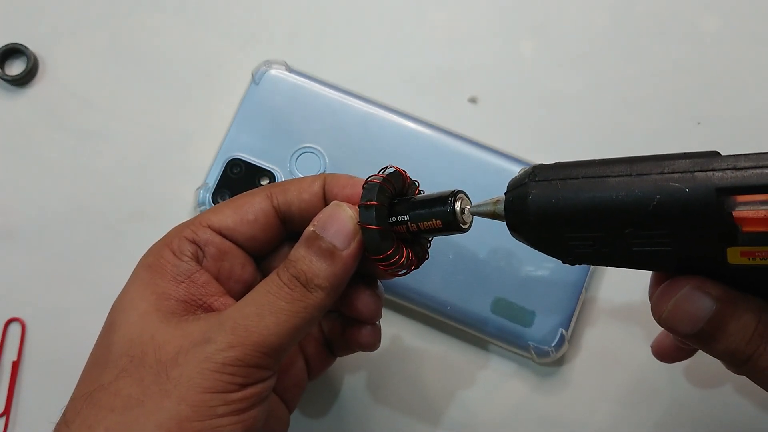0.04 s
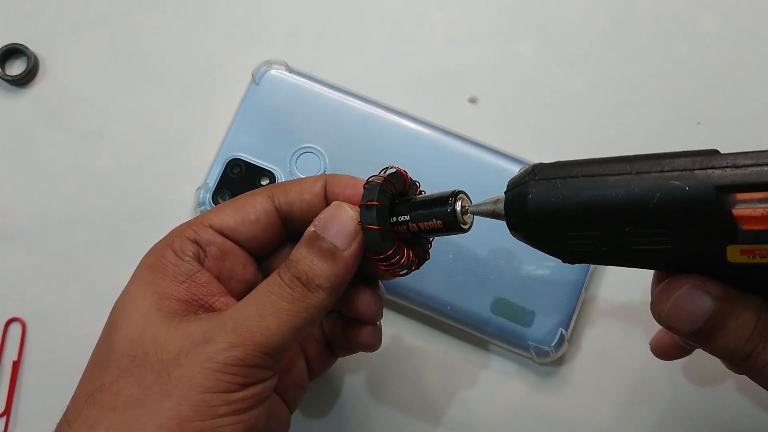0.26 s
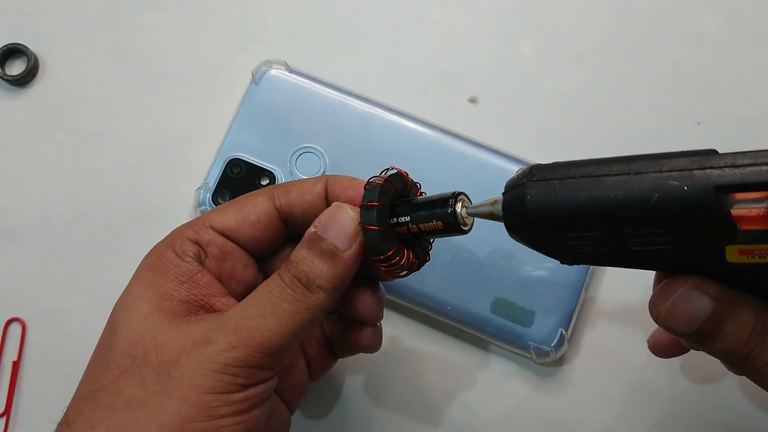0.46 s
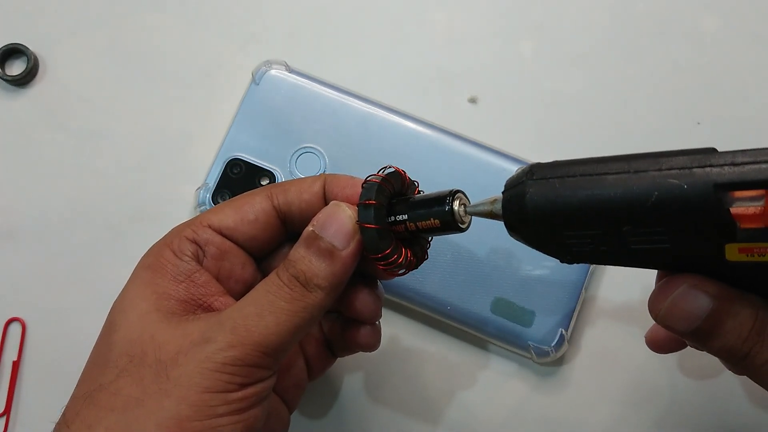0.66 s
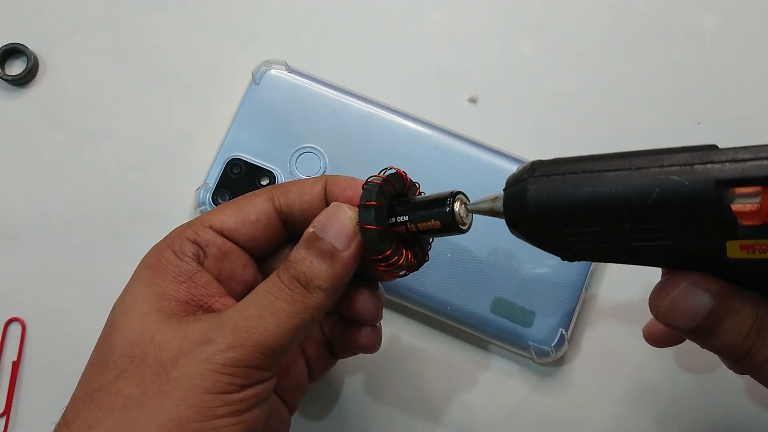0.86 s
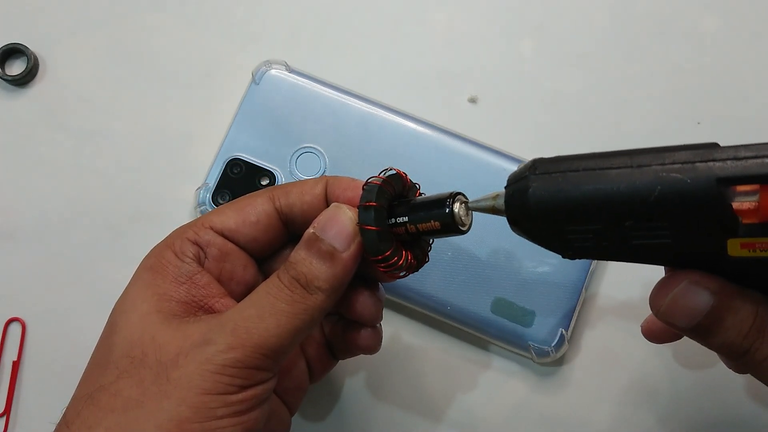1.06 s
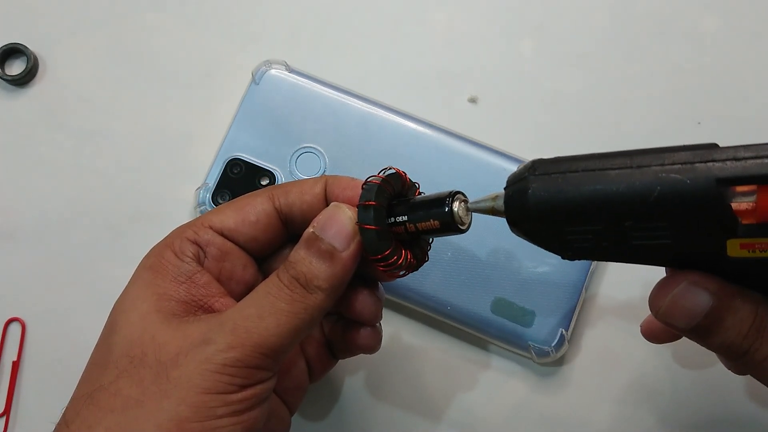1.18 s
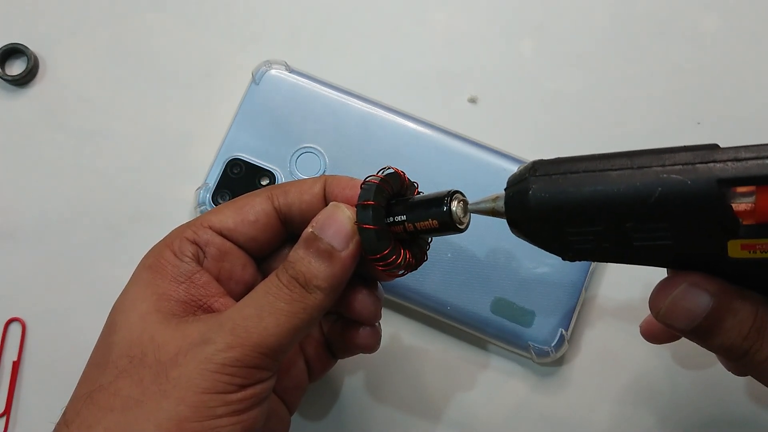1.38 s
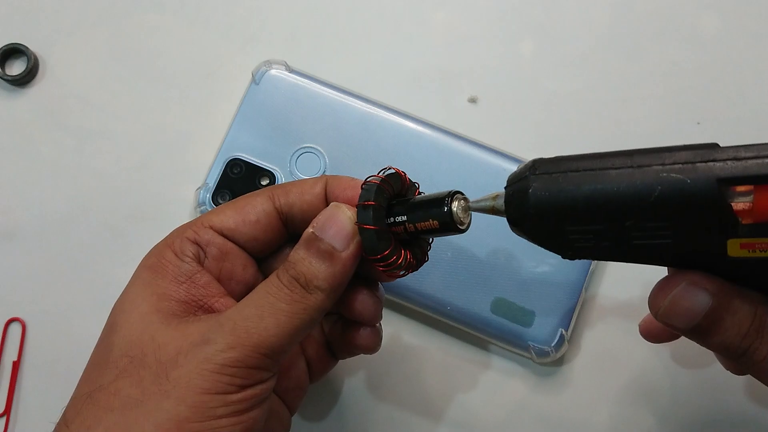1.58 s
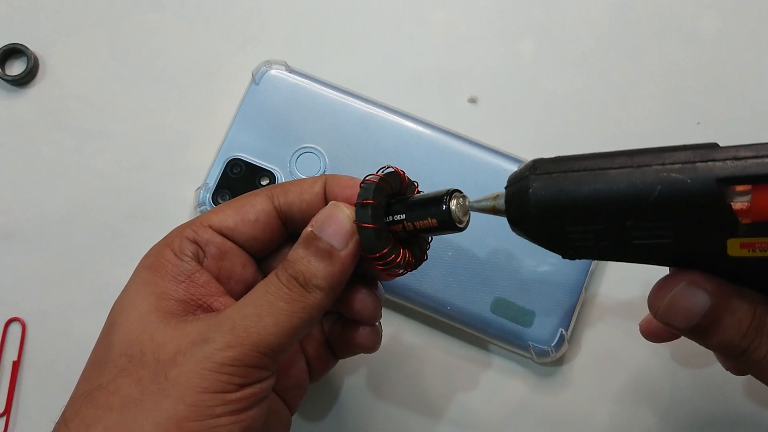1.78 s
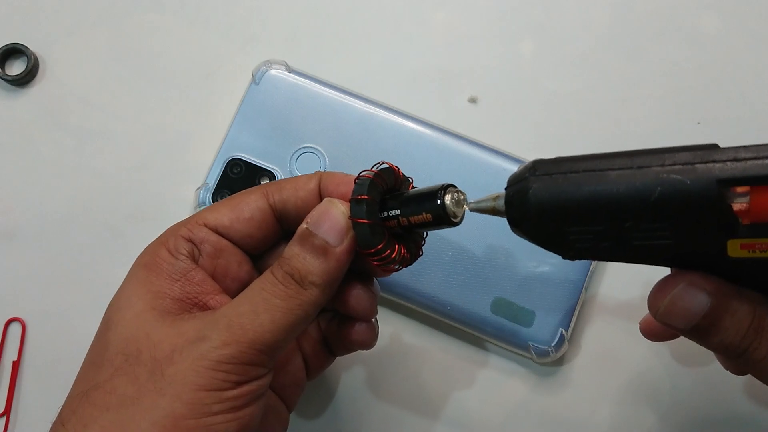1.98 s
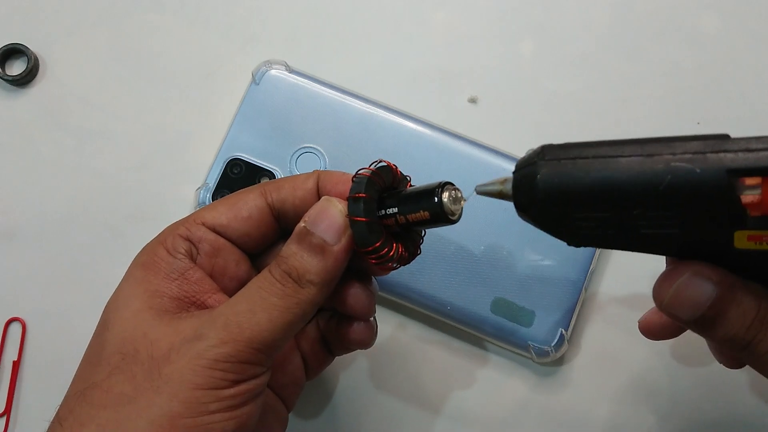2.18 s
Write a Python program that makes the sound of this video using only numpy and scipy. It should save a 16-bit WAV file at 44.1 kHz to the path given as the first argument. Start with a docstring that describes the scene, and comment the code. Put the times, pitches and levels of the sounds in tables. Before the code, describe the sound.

A hot glue gun gives one sharp, bright plastic click at about 1.6 seconds, close by, with a short echo from a small bare room. Before it come only a faint hand rustle at the start and tiny ticks near 0.8 and 1.4 seconds. A small cluster of light handling ticks follows around 2.2 seconds. A very quiet room rush and low hum continue throughout.

```python
"""A desk in a small bare room: a hot glue gun, held against a battery, gives one sharp plastic click.
The snap and its quick rebound push the air and ring the shell for a few milliseconds; the walls answer.
Faint handling ticks and hand rustles come before and after, and the sliding nozzle barely squeaks.
Underneath lies a bed of room rush, fan tones and low mains hum."""
import sys
import numpy as np
from scipy import signal
from scipy.fft import rfft, irfft
from scipy.io import wavfile

SR = 44100
rng = np.random.default_rng(int(sys.argv[2]) if len(sys.argv) > 2 else 0)


def file_out(sig):
    """Save sig as 16-bit WAV at sys.argv[1]."""
    # one column per channel
    cols = np.atleast_2d(sig).T
    # limit, then scale
    lim = np.clip(cols, -1, 1)
    pcm = np.round(lim * 32767).astype(np.int16)
    wavfile.write(sys.argv[1], SR, pcm)


N = 98651


def amp(db):
    """Decibels to gain."""
    return 10 ** (np.asarray(db) / 20)


def unit(x):
    """Scales to rms 1."""
    return x / np.sqrt(np.mean(abs(x) ** 2) + 1e-20)


def read(points, hz, column=1):
    """Reads a column of a table on a log-frequency axis."""
    table = np.array(points, float)
    return np.interp(np.log(hz + 1), np.log(table[:, 0] + 1), table[:, column])


def pan(db):
    """Left and right gains for a left-minus-right level difference."""
    return amp([[db / 2], [-db / 2]])


def add(mix, start, sound):
    """Lays a sound into the stereo mix at a time in seconds."""
    part = mix[:, round(start * SR):][:, :sound.shape[-1]]
    part += sound[..., :part.shape[1]]


def pulse(points, column=1, size=4096):
    """A minimum-phase pulse with the given spectrum."""
    log_gain = np.log(amp(read(points, abs(np.fft.fftfreq(size, 1 / SR)), column)))
    return np.fft.ifft(np.exp(np.conj(signal.hilbert(log_gain)))).real[:size // 2]


def drift(hz):
    """Smooth random motion of rms 1, rolling off above hz."""
    f = np.fft.rfftfreq(N, 1 / SR)
    return unit(irfft(rfft(rng.standard_normal(N)) * np.exp(-(f / hz) ** 2) * (f > 0), N))


def soften(x, hz):
    """Gentle one-pole low-pass."""
    r = np.exp(-2 * np.pi * hz / SR)
    return signal.lfilter([1 - r], [1, -r], x)


def decay(t, t60):
    """Exponential envelope, 60 dB down at t60."""
    return np.exp(-np.log(1000) * t / t60)


def swell(start, length):
    """One smooth rise and fall, timed in seconds."""
    return np.sin(np.pi * np.clip((np.arange(N) / SR - start) / length, 0, 1))


def room_rush():
    """Room tone: dark noise, narrow in the bass and wide on top, its hiss easing down and back up."""
    # tone of the rush: f/Hz, relative level/dB
    spectrum = [(20, -25), (33, -16), (50, -3.5), (68, 1), (85, 3.5), (110, -5.5), (135, 1.5), (170, -6.5),
                (200, -4), (240, -5.5), (300, -10), (420, -9), (540, -12), (680, -17.5), (810, -8.5),
                (950, -18), (1150, -22.5), (1350, -19.5), (1700, -30), (2200, -29.5), (2650, -31.5),
                (3400, -34), (4300, -32.5), (5100, -42), (5800, -46.5), (8000, -39.5), (12000, -36.5),
                (15500, -38)]
    # likeness of left and right: f/Hz, correlation/0-1
    likeness = [(50, 1), (1000, 0.73), (3000, 0.6), (8000, 0.2), (15000, .3)]
    # stereo balance: f/Hz, left minus right/dB
    balance = [(60, -3.5), (180, -4.5), (550, -4), (1650, -7), (5000, 2.5), (15000, -3)]
    # ride of the treble shelf: t/s, gain/dB
    hiss_ride = [(0, 3), (.55, 2.5), (.9, 0), (1.55, 0.5), (2.0, 2), (2.24, 3.5)]
    hz, t = np.fft.rfftfreq(N, 1 / SR), np.arange(N) / SR
    a, b = rfft(rng.standard_normal((2, N)))
    same, lean = read(likeness, hz), amp(read(balance, hz) / 2)
    pair = np.array([a * lean, (same * a + np.sqrt(1 - same ** 2) * b) / lean])
    rush = unit(irfft(pair * amp(read(spectrum, hz)), N))
    hiss = rush - soften(rush, hz=3300)
    hiss_gain = amp(np.interp(t, *np.transpose(hiss_ride)))
    return amp(-63 + 0.15 * drift(hz=3)) * (rush + (hiss_gain - 1) * hiss)


def hum():
    """Faint wavering fan tones and a slowly swelling mains hum, right of centre."""
    # fan tones: f/Hz, level/dB
    fan_tones = [(48.4, -70.5), (301, -80), (770, -84.5), (826, -85)]
    # swell of the mains hum: t/s, gain/dB
    mains_ride = [(0, 5), (.2, -0.5), (.35, -2.5), (.7, -6), (.9, 5), (1.0, 1.5), (1.07, -3), (1.35, -2.5),
                  (1.6, -2.5), (1.85, 7), (2.0, -6), (2.24, 0.5)]
    fan, t = np.zeros(N), np.arange(N) / SR
    for hz, db in fan_tones:
        waver = 1 + 0.38 * (drift(hz=8.3) + 1j * drift(hz=8.3))  # in level and phase
        fan += amp(db) * unit((waver * np.exp(2j * np.pi * (hz * t + rng.random()))).real)
    mains_hz, mains_db = 95.9, -66.5 + np.interp(t, *np.transpose(mains_ride))
    mains = amp(mains_db) * unit(np.sin(2 * np.pi * (mains_hz * t + rng.random())))
    return pan(db=-4.5) * (fan + mains)


def room_response(size=256):
    """Sparse reflections, weak until the walls answer, each band dying at its own speed."""
    # reverb time: f/Hz, t60/s
    reverb_times = [(200, 0.34), (700, 0.33), (1800, .5), (4600, 0.47), (8500, 0.4), (12500, 0.32),
                    (16000, 0.32)]
    # likeness of left and right in the reverb: f/Hz, correlation/0-1
    likeness = [(200, 0.5), (500, 1), (1000, 0), (3000, 0)]
    attack_s, walls_s, early_gain = .002, .01, .45
    taps = rng.standard_normal((2, SR)) * (rng.random((2, SR)) < .25)
    hz, frame_s, (a, b) = signal.stft(taps, SR, nperseg=size)
    same = read(likeness, hz)[:, None]
    bands = np.array([a, same * a + np.sqrt(1 - same ** 2) * b])
    bands *= decay(frame_s, read(reverb_times, hz)[:, None])
    tail = signal.istft(bands, SR, nperseg=size)[1][:, :SR]
    t = np.arange(SR) / SR
    tail *= np.minimum(t / attack_s, 1) * np.where(t < walls_s, early_gain, 1)
    return tail / np.linalg.norm(tail, axis=1, keepdims=True)


def rubbing():
    """The hands shift with a dull rustle, and the nozzle squeaks faintly as it slides off."""
    # hand rustles: t/s, length/s, centre f/Hz, level/dB
    rustles = [(0.0, 0.19, 157, -68), (2.169, 0.045, 590, -78), (2.171, 0.039, 3050, -78.5)]
    squeak_hz = 2190
    slips = drift(hz=69.4) + 1j * drift(hz=69.4)
    squeak = unit((slips * np.exp(2j * np.pi * squeak_hz * np.arange(N) / SR)).real)
    out = amp(-84.5) * swell(start=1.954, length=.2) * squeak
    for start, length, hz, db in rustles:
        band = signal.butter(2, [hz / 2, hz * 2], "band", fs=SR, output="sos")
        rustle = unit(signal.sosfilt(band, rng.standard_normal(N)))
        out += amp(db) * swell(start, length) * rustle
    return pan(db=-6) * out


def handling_ticks():
    """Small ticks of gun and battery: a puff of noise and one short, rough ring each, with reverb."""
    # ticks: t/s, level/dB, left minus right/dB, body f/Hz, body gain/dB, snap gain/dB
    ticks = [(0.7514, -46, 5, 8800, -37, -2), (1.384, -52.5, 0, 4330, -22, -3.5),
             (1.6117, -46, 2, 9100, -27.5, 2.5), (2.1947, -31.5, -5.5, 1420, -25, -1.5),
             (2.1955, -30.5, -2, 812, -22, -14.5), (2.1963, -31.5, -6.5, 2860, -22, -7.5),
             (2.197, -34.5, 0, 4135, -16.5, -23), (2.2216, -37.5, -4, 2800, -34, 6),
             (2.2285, -31, 9.5, 4440, -17, -5)]
    out, t = np.zeros((2, N)), np.arange(SR // 10) / SR
    for start, db, pan_db, hz, body_db, snap_db in ticks:
        snap = amp(snap_db - 17) * rng.standard_normal((2, len(t))) * decay(t, t60=.009)
        roughness = .5 * drift(hz=400)[:len(t)]
        body = amp(body_db) * np.sin(2 * np.pi * hz * t + roughness) * decay(t, t60=.019)
        add(out, start, amp(db) * pan(pan_db) * (soften(snap, hz=6000) + body))
    reverb = signal.fftconvolve(out, room_response(), axes=1)[:, :N]
    return out + amp(-4.5) * reverb


def glue_gun_click():
    """The snap pushes the air and its rebound pulls it; both ring the shell, and the room answers."""
    # snap, then rebound: push gain/dB, push low-pass f/Hz, ring gain/dB
    contacts = [(2, 12000, 2), (-3, 860, 0)]
    # the shell's push on the air: f/Hz, level/dB
    push_spectrum = [(60, -17.5), (170, -12), (350, -0.5), (620, -4.5), (870, -0.5), (1150, -10),
                     (1420, -3.5), (2000, -8), (2700, -7.5), (3300, -6), (4000, -5.5), (5600, -15.5),
                     (9000, -2.5), (14000, -11.5), (16000, -15)]
    # modes of the shell: f/Hz, t60/s, left level/dB, right level/dB
    shell_modes = [(2600, .007, -52.5, -48), (4000, .009, -42.5, -50), (5320, .011, -39.5, -42),
                   (6560, 0.0045, -35, -24.5), (8370, 0.0078, -34.5, -23), (9230, 0.0055, -33, -17.5),
                   (9500, 0.0083, -31, -31), (10230, 0.0091, -19.5, -26.5), (11490, .009, -31.5, -25.5),
                   (12750, .009, -16, -25.5), (13440, 0.006, -18.5, -28), (13790, 0.0097, -20, -26.5),
                   (14400, 0.0072, -30.5, -28.5), (14880, .007, -36, -30)]
    # dense crack of the plastic: f/Hz, level/dB
    crack_spectrum = [(200, -26.5), (1500, -20), (5500, -11.5), (8500, -0.5), (13500, -1), (16000, -12)]
    # colour of the click as it fills the room: f/Hz, left level/dB, right level/dB
    send_spectrum = [(100, -16, -10.5), (351, -10, -7.5), (850, -13, -10), (1500, -21.5, -17),
                     (2500, -19, -17.5), (3300, -15, -14.5), (3800, -18, -19.5), (4600, -11.5, -14),
                     (5310, -14.5, -12), (6040, -18.5, -16.5), (6640, -7, -5.5), (7300, -9.5, -11.5),
                     (8140, -3.5, 1), (9200, 0, -0.5), (11000, 2, -2), (11600, -0.5, -4), (12900, 4.5, -5),
                     (14300, -2.5, -5.5), (14940, -5, -9), (15560, -19.5, -25)]
    click_s, rebound_s = 1.6482, .00172
    out, t = np.zeros((2, N)), np.arange(SR // 10) / SR
    ring = np.zeros((2, len(t)))
    for k, (hz, t60, left, right) in enumerate(shell_modes):
        ring += (-1) ** k * amp([[left], [right]]) * decay(t, t60) * np.sin(2 * np.pi * hz * t)
    for k, (push_db, cutoff_hz, ring_db) in enumerate(contacts):
        start = click_s + k * rebound_s
        push = (-1) ** k * soften(pulse(push_spectrum), cutoff_hz)
        add(out, start, amp(push_db) * pan(db=-3.5) * push)
        add(out, start, amp(ring_db) * ring)
    burst = rng.standard_normal((2, len(t))) * decay(t, t60=.011)
    crack = signal.fftconvolve(burst, pulse(crack_spectrum)[None], axes=1)
    add(out, click_s, amp(-20) * crack)
    send = np.array([pulse(send_spectrum, column=1), pulse(send_spectrum, column=2)])
    reverb = signal.fftconvolve(room_response(), send, axes=1)
    add(out, click_s, amp(2.5) * reverb)
    return out


def scene():
    """The click up front, the handling around it and the room tone beneath."""
    return glue_gun_click() + handling_ticks() + rubbing() + room_rush() + hum()


def record(dry):
    """A steep low-pass at 15.8 kHz trims the very top of the mix."""
    low_pass = signal.firwin(255, 15800, window=("kaiser", 8), fs=SR)
    return signal.oaconvolve(dry, low_pass[None], "same")


dry = scene()
out = record(dry)
file_out(out)
```